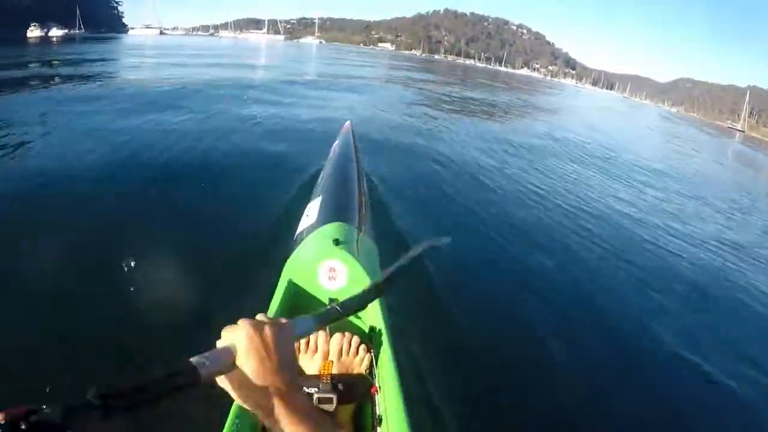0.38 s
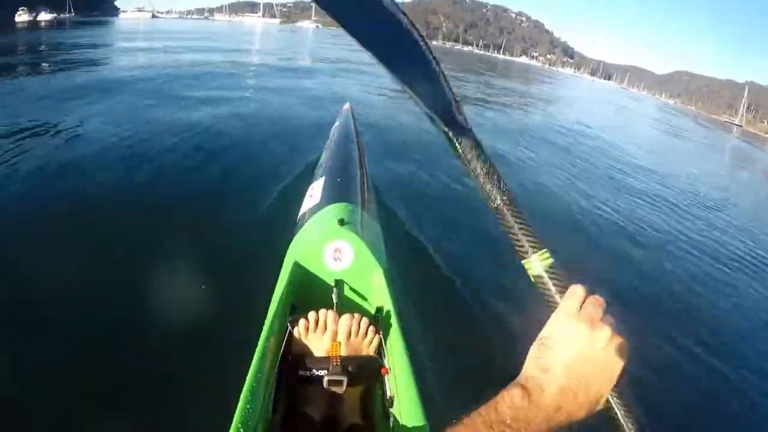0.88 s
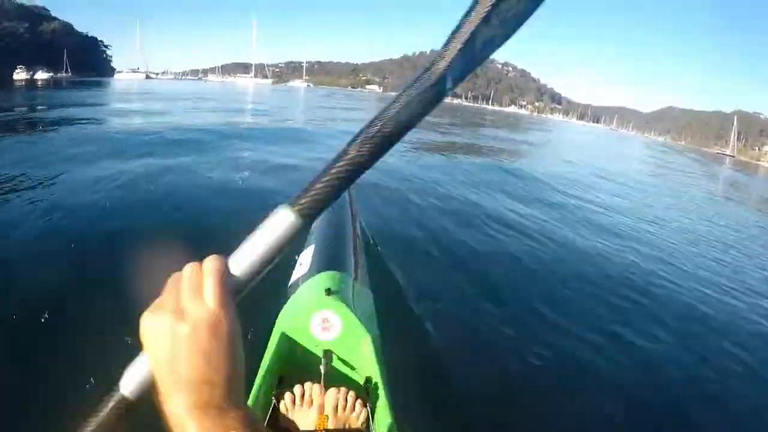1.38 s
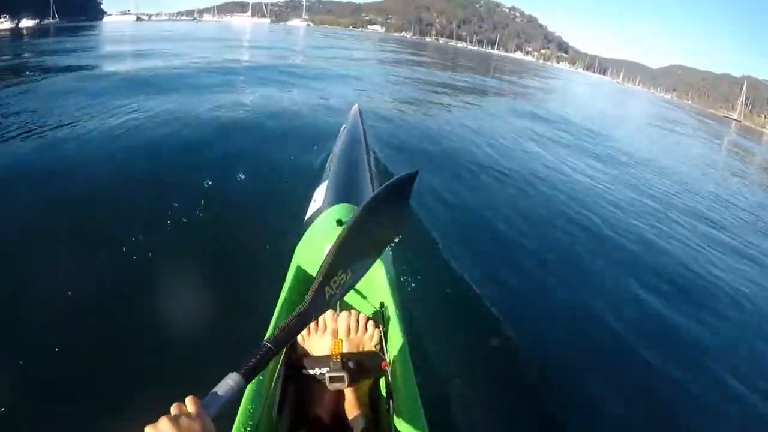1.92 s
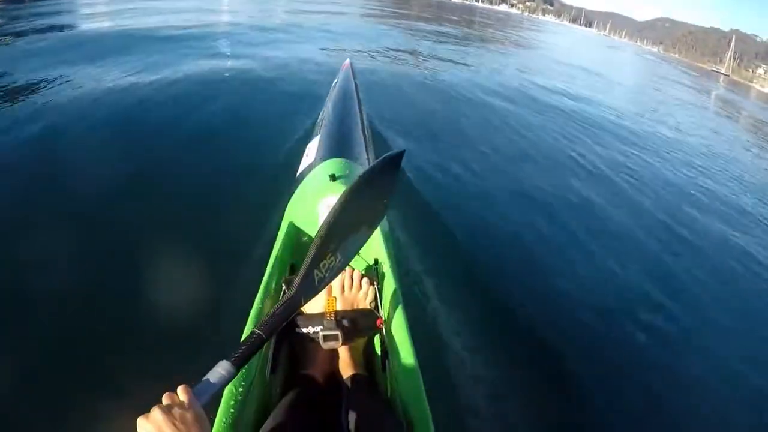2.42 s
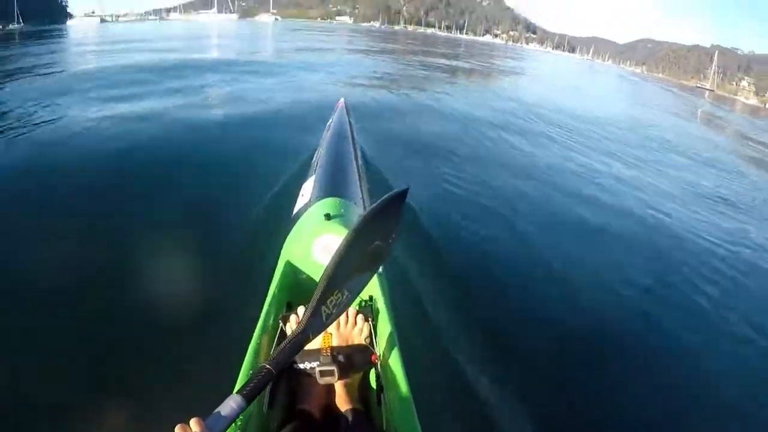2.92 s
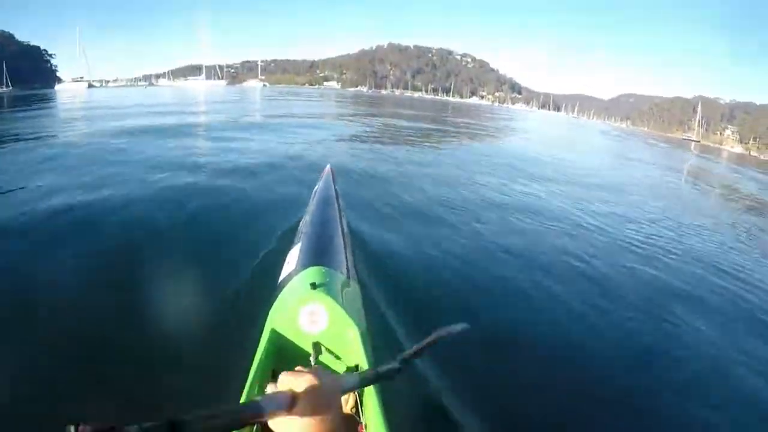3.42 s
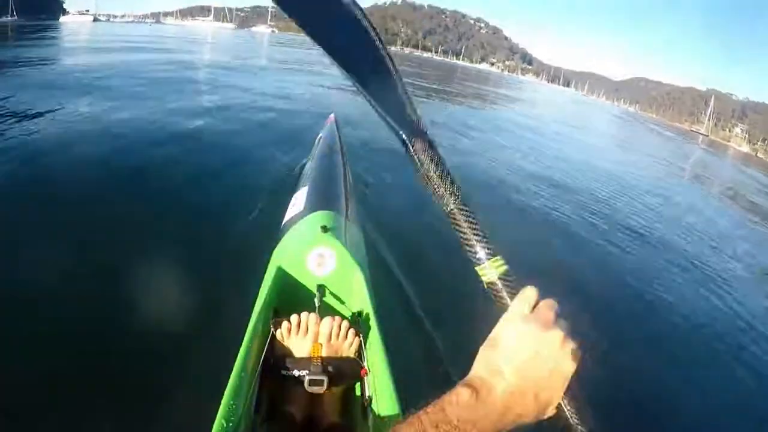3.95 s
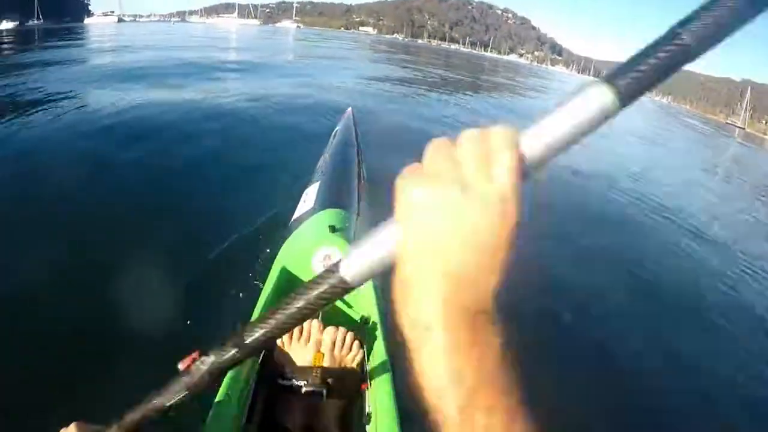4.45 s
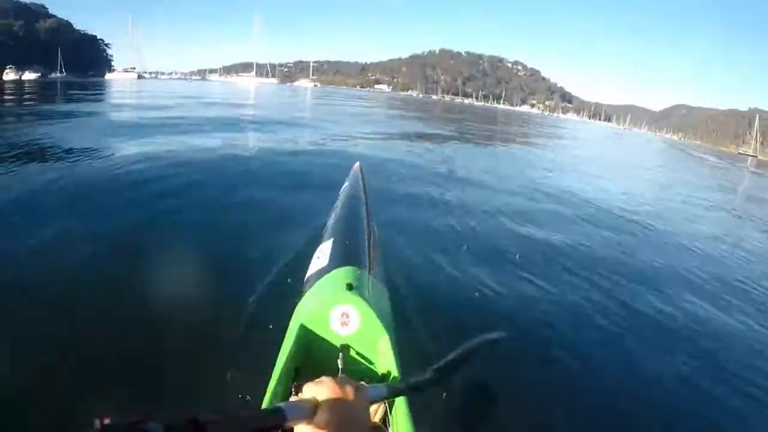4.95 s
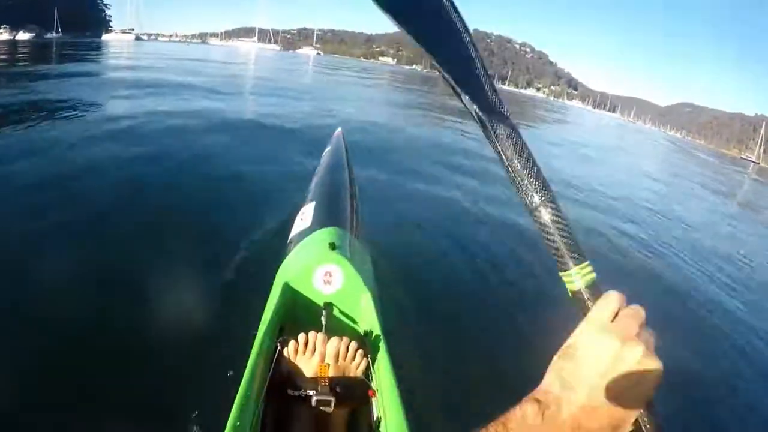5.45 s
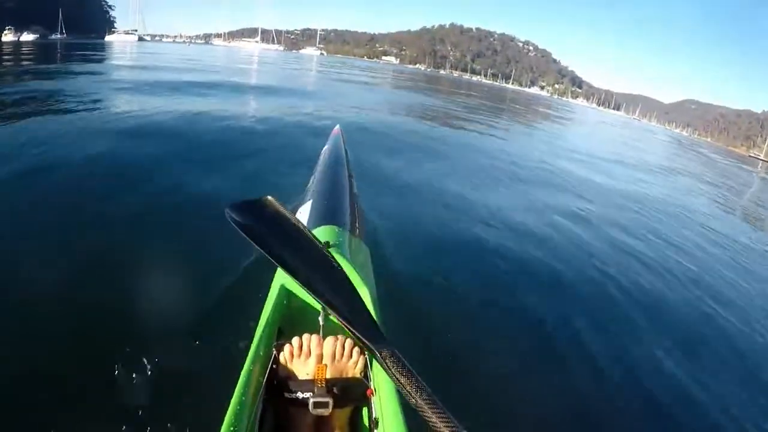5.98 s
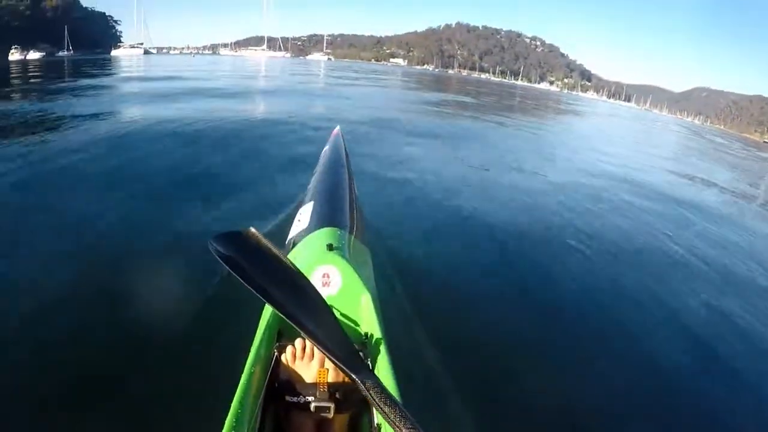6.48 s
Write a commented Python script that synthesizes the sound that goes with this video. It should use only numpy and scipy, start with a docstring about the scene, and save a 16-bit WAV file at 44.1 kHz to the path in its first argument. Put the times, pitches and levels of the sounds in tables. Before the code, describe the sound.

Close, muffled stereo sound of paddling, dry and without echo. Water rushes and trickles against the hull over a wavering deep rumble. A sharp wet splash and a cluster of bubbly plops come early, followed by a calmer glide with occasional drips. Swishing strokes resume, with a quick pair of dull knocks and another heavier knock with a low thud, then gentle dripping.

```python
"""A kayak glides over calm water, heard by two microphones inside a sealed camera housing worn by the paddler.
From the start, air and body motion rumble below a hiss, and wash, spray and gurgling bubbles run on: all shaped noise
or clusters of short tones. Drops (noise bursts) and pitched plops fall throughout, the drops strongest near 1.3 s,
the plops near 1.5 s. Swishes, which are longer bursts, stand out near 3.5 s. Three knocks travel up through
the mount at 4.2, 4.27 and 5.11 s as swelling tones, then water and small drops carry on to the end at 6.6 s."""
import sys
import numpy as np
from scipy import signal
from scipy.fft import rfft, irfft, next_fast_len
from scipy.io import wavfile
from scipy.ndimage import uniform_filter1d

SR = 44100
rng = np.random.default_rng(int(sys.argv[2]) if len(sys.argv) > 2 else 0)


def digitize_waveform(pressure):
    """Quantize a signal to 16-bit integers and store it at the path in sys.argv[1].

    Rows of a 2-D input are taken as channels; values are limited to [-1, 1].
    """
    field = np.atleast_2d(pressure).T
    bounded = np.clip(field, -1, 1)
    quanta = np.round(bounded * 32767).astype(np.int16)
    wavfile.write(sys.argv[1], SR, quanta)


def field_ratio(decibels):
    """Amplitude ratio for a level in dB (20 dB per decade); scalars and array-likes work."""
    return 10 ** (np.asarray(decibels, dtype=float) / 20)


N = 291525  # length in samples, about 6.6 s


def rms_one(x):
    """Scale a sound so that its rms is 1."""
    return x / np.sqrt(np.mean(x ** 2) + 1e-20)


def in_time(rows):
    """Join the rows of a time table by straight lines: one value a sample for each column."""
    seconds, *columns = np.transpose(rows)
    return [np.interp(np.arange(N) / SR, seconds, column) for column in columns]


def drift(rate_hz):
    """Slow random wandering of rms 1: noise smoothed to about rate_hz."""
    step = 40  # samples between computed points
    r = np.exp(-2 * np.pi * rate_hz * step / SR)
    noise = rng.standard_normal(N // step + 2002)
    slow = signal.lfilter([1], [1, -2 * r, r * r], noise)[2000:]  # skip the filter's settling
    return np.interp(np.arange(N) / step, np.arange(len(slow)), rms_one(slow))


def coloured(spectrum):
    """Noise of rms 1, its frequencies weighted by a spectrum table."""
    size = next_fast_len(N)
    hz, db = np.transpose(spectrum)
    log_hz = np.log(np.arange(size // 2 + 1) * SR / size + 1)
    weight = field_ratio(np.interp(log_hz, np.log(hz), db))
    return rms_one(irfft(rfft(rng.standard_normal(size)) * weight, size)[:N])


def add(track, start_s, piece):
    """Mix a short piece into a track at start_s seconds."""
    i = round(start_s * SR)
    track[i:i + len(piece)] += piece[:N - i]


def ring(force, hz, t60, lead=0):
    """A resonance: a unit click starts a sine at phase lead, which falls by 60 dB in t60 seconds."""
    r = field_ratio(-60 / (t60 * SR))
    w = 2 * np.pi * hz / SR
    return signal.lfilter([np.sin(lead), r * np.sin(w - lead)], [1, -2 * r * np.cos(w), r * r], force + 1e-18)


def housing(force, modes, apart):
    """One force rings each resonance, wall and cavity in series; a share of the right side hears another spot."""
    # the other spot: noise from elsewhere in time, given the loudness of this moment
    loudness = np.sqrt(uniform_filter1d(force ** 2, size=64) + 1e-18)
    other = np.roll(force / loudness, N // 3) * loudness
    right_force = np.sqrt(1 - apart) * force + np.sqrt(apart) * other
    out = np.zeros((2, N))
    for hz, width, left_db, right_db, lead in modes:
        t60 = np.log(1000) / (np.pi * width)  # a wide resonance dies quickly
        gain = 2 * np.pi * width ** 1.662 / SR
        out[0] += field_ratio(left_db) * gain * ring(ring(force, hz, t60), hz, t60)
        out[1] += field_ratio(right_db) * gain * ring(ring(right_force, hz, t60), hz, t60, lead)
    return out


def bursting_rush(per_s, spread_db, clump_db, smooth):
    """Tiny bubbles burst as single clicks over a smooth rush of noise; both swell and sink in clumps."""
    sizes = field_ratio(spread_db * np.minimum(rng.exponential(1, N), 5)) * rng.choice([-1, 1], N)
    born = rng.random(N) < per_s / SR
    return field_ratio(clump_db * drift(19)) * (rms_one(sizes * born) + smooth * rng.standard_normal(N))


# Drops and slaps. Each row: start in seconds, strength in dB before the housing, centre in octaves above
# 1450 Hz, loss in dB per octave away from that centre.
DROPS = [(.381, -37.5, 1.1, 13), (0.4943, -31, 2, 22), (0.532, -42.5, 2, 9), (0.619, -48, 1, -1),
         (0.7483, -38, 3, 4.5), (1.034, -35, 0.8, 9), (1.1204, -38.5, 0.2, 4), (1.2369, -38, 2, 7),
         (1.2614, -39, 4.2, 0), (1.3135, -18, 0.2, 52), (1.318, -22, 1.53, 10), (1.3306, -38, 1.5, 9),
         (1.4476, -38, 0, 16), (1.7927, -29.5, 0.78, 55), (2.3248, -27.5, 0.07, 32),
         (2.832, -33.5, -0.5, 7), (2.9452, -28.5, 0.1, 19), (3.3071, -32.5, -0.2, 34), (3.5188, -43, 1, 21),
         (3.592, -36.5, 2.5, 9.5), (3.8042, -39.5, 2.5, 20), (4.027, -38, -3, 16), (4.104, -38, -0.9, 7),
         (4.1684, -40, 0.3, 6), (4.3488, -44.5, 3, 3), (4.421, -29, 1.5, 18), (5.0478, -34, 0, 12),
         (5.2783, -31, 0, 20), (5.746, -40, 0, 7), (5.8568, -34, 0.8, 11), (5.8735, -40, -0.5, 4),
         (6.434, -45, -0.4, 2), (6.4733, -38.5, .5, 9), (6.5008, -38.5, .3, 12)]
# Longer swishes as the blade enters or leaves the water. Each row: start in seconds, strength in dB before
# the housing, centre in octaves above 1450 Hz.
SWISHES = [(0.499, -50, -3), (1.216, -46.5, 2), (1.324, -54, 5), (1.80, -48, -2.8), (3.505, -40.5, -6),
           (3.60, -42, -9), (4.095, -44.5, -2), (4.327, -43, 5.5), (5.019, -47, 4.5), (5.73, -57, -3),
           (5.85, -50, -0.5)]


def drops(hz):
    """The bursts of noise as they push resonances near hz: each swells quickly and dies away."""
    drop_s, swish_s, swish_loss = 0.0038, 0.028, 1  # decay times in s, dB per octave
    most_loss_db = 21  # every burst still reaches far resonances this much weaker
    out, t = np.zeros(N), np.arange(6000) / SR
    octave = np.log2(hz / 1450)
    bursts = [(*row, drop_s) for row in DROPS] + [(*row, swish_loss, swish_s) for row in SWISHES]
    noises = rng.choice([-1, 1], (len(bursts), len(t)))
    for (start, strength_db, centre, loss, decay_s), noise in zip(bursts, noises):
        shape = (1 - np.exp(-t / (0.53 * decay_s))) * np.exp(-t / decay_s)
        shape = shape / np.sqrt(min(decay_s, 0.006) * SR)
        loss_db = min(abs(loss * (octave - centre)), most_loss_db)
        add(out, start, field_ratio(strength_db - loss_db) * noise * shape)
    return out


# Flow of the water. Each row: time in seconds, then the levels in dB of the wash along the hull,
# the spray off the blade and the trickle.
WATER = [(0.0, -47.5, -61, -72), (0.31, -50, -65, -68), (0.6, -46, -57, -74), (0.99, -47, -65.5, -77),
         (1.4, -45.5, -60.5, -70), (1.6, -48.5, -64.5, -71), (2.3, -49.5, -64, -91),
         (3.09, -51.5, -61, -90), (3.28, -50, -64, -81), (3.42, -59, -65, -86), (3.6, -47.5, -66.5, -69),
         (3.76, -42.5, -60.5, -79), (4.14, -49, -73, -71), (4.3, -54.5, -71, -79), (4.4, -57.5, -60, -75),
         (4.5, -48, -60, -62), (4.75, -50.5, -68.5, -84), (5.21, -50, -63, -82), (5.43, -46, -69, -80),
         (5.69, -49.5, -64, -66), (5.82, -54.5, -62.5, -60), (5.98, -58.5, -74, -72), (6.2, -61, -62, -70),
         (6.61, -59.5, -65.5, -63.5)]
# Patter, then fizz, which follow the other water. Each row: level in dB at mean flow, the shares taken of the
# swings of wash, spray and trickle, lag in seconds.
FOLLOW = [(-58, 0.41, 0.5, 0.067, .01), (-62, 0.7, 0.42, -0.2, 0.072)]
# Housing resonances in groups for wash, patter, fizz, trickle and spray. Each row: pitch in Hz, width in Hz of
# each of the two stages, left and right gain in dB, lead of the right side in radians.
HOUSING = [
    [(1168, 150, -1, 3, 4), (1280, 79, -3.5, 3, -2), (1490, 297, -2, 6.5, -1), (1694, 220, -6.5, -3, 1)],
    [(2055, 320, 0, 3.5, -1.56), (2660, 320, 4, 1.5, 4)],
    [(3095, 280, -9, -8, 1.3), (3273, 346, -0.5, -2.5, -1.07), (3503, 214, -8.5, -5.5, 0.9)],
    [(4870, 830, -31, -5, 2.02)],
    [(5740, 960, -1.5, -5, 0.13), (6360, 1650, -3.5, -10, 3.6), (7650, 3800, -14, -15.5, 1.6)],
]
# Texture of wash, patter, fizz, trickle and spray. Each row: bursts per second, size spread in dB, clumping in
# dB, amount of smooth rush, share heard apart on the right (0 to 1), gain of the drops in dB.
GRAIN = [(504, 2.5, 1.54, 1, 0.21, -17.5), (900, -1, 3, 0.93, 0.09, -20), (696, 2.5, 1, 0.84, 0.1, -15),
         (487, 2.5, 0.5, 0.35, 0.36, -13), (1200, 2.5, 2.5, 0.51, 0.98, -16.5)]


def water():
    """Each kind of water, with its share of the drops, rings its own group of housing resonances."""
    flows, t = np.array(in_time(WATER)), np.arange(N) / SR
    wash_db, spray_db, trickle_db = flows
    swings = flows - flows.mean(axis=1, keepdims=True)
    patter_db, fizz_db = [db + np.interp(t - lag, t, np.dot(shares, swings)) for db, *shares, lag in FOLLOW]
    levels = [wash_db, patter_db, fizz_db, trickle_db, spray_db]
    out = np.zeros((2, N))
    for level_db, modes, (*texture, apart, drop_db) in zip(levels, HOUSING, GRAIN):
        rush = bursting_rush(*texture)
        rung_rms = np.sqrt(np.mean(housing(rush, modes, apart) ** 2))
        mean_hz = np.mean(modes, axis=0)[0]
        force = field_ratio(level_db) * rush / rung_rms + field_ratio(drop_db) * drops(mean_hz)
        out += housing(force, modes, apart)
    return out


def swing(hz, rise, lead=0):
    """Bending waves arrive spread out: a tone swells to a deep trough in about rise seconds, then dies."""
    t = np.arange(4000) / SR
    envelope = (t / rise) ** 2.24 * np.exp(2.55 * (1 - t / rise))
    return -envelope * np.cos(2 * np.pi * hz * (t - rise) + lead)


# Knocks. Each row: start in seconds, strength in dB before the mount's own gains, contact pitch in Hz, loss in
# dB per squared octave away from it, most loss in dB (the crack), stretch of the mount's swell times, thud level
# in dB, thud delay in seconds.
KNOCKS = [(4.2010, -14.5, 420, 10.5, 14.5, 0.86, -11.5, 0.0077),
          (4.2685, -10.5, 545, 13.5, 27, 0.62, -22, 0.0061), (5.1116, -2, 690, 35.5, 22.5, 1, -7, 0.0065)]
# Tones of the mount. Each row: pitch in Hz, swell time in seconds before the knock's stretch, left and right
# gain in dB, lead of the right side in radians.
MOUNT = [(229.6, 0.01125, 1, 1.5, 0.63), (420, 0.0033, 2.5, -11, 4.5), (609, 0.00356, -7, -9.5, -2),
         (830, 0.00167, -6.5, -8.5, -2.5), (1175, 0.00188, 1.5, -5, -2.5), (1580, 0.0017, -5, -0.5, 8),
         (2020, 0.00175, -14, -10.5, -1.5), (2670, 0.0018, -21, -20, 1)]


def knocks():
    """A knock favours mount tones near its contact pitch, its crack reaches all; a low thud follows on both sides."""
    thud_hz, thud_rise_s = 84.7, 0.0095
    linger_db, linger_t60_s = -14, 0.041  # each tone also rings on faintly
    out, t = np.zeros((2, N)), np.arange(4000) / SR
    for start, strength_db, contact_hz, loss, crack_db, stretch, thud_db, delay in KNOCKS:
        for hz, rise, left_db, right_db, lead in MOUNT:
            level_db = strength_db - min(loss * np.log2(hz / contact_hz) ** 2, crack_db)
            linger = field_ratio(linger_db - 60 * t / linger_t60_s) * (1 - np.exp(-t / rise))
            for side, db, phase in zip(out, [left_db, right_db], [0, lead]):
                tail = -linger * np.cos(2 * np.pi * hz * (t - rise * stretch) + phase)
                add(side, start, field_ratio(level_db + db) * (swing(hz, rise * stretch, phase) + tail))
        for side in out:
            add(side, start + delay, -field_ratio(thud_db) * swing(thud_hz, thud_rise_s))
    return out


def bubble(hz, t60, lead=0):
    """A bubble near the surface rings as a decaying sine; its pitch climbs by 26 % over t60 seconds."""
    t = np.arange(round(t60 * SR)) / SR
    envelope = field_ratio(-60 * t / t60) * (1 - np.exp(-t / 0.00013))
    return envelope * np.sin(2 * np.pi * hz * t * (1 + 0.13 * t / t60) + lead)


# Bubbles that pop with a pitch. Each row: start in seconds, strength in dB, middle pitch in Hz, length of the
# plop in seconds, tilt to the left over the right in dB.
PLOPS = [(.219, -33, 827, .05, -6), (0.382, -41, 1680, 0.026, 5), (1.354, -35, 1200, 0.0387, -1),
         (1.409, -39, 1010, .04, 1), (1.45, -42, 910, 0.04, -12), (1.505, -30.5, 1050, 0.036, -1.5),
         (1.592, -43, 914, 0.033, -9), (1.793, -38, 2044, 0.082, -5), (4.029, -33, 1710, 0.028, 4),
         (4.716, -39, 1190, 0.026, -1), (4.952, -35, 900, 0.045, -5.5), (5.28, -53, 1580, 0.043, -14),
         (5.791, -41.5, 2114, 0.065, 10), (6.434, -37, 2200, 0.036, 8)]


def plops():
    """Each plop is a cluster of eight bubbles; the right side is shifted in phase as the housing makes it."""
    out, modes = np.zeros((2, N)), np.array(sum(HOUSING, []))
    clusters = rng.random((len(PLOPS), 8, 2))
    for (start, strength_db, hz, length, tilt_db), cluster in zip(PLOPS, clusters):
        t60 = 0.77 * length
        for late, pitch in cluster:
            own_hz = hz * 2 ** (1.1 * (pitch - 0.5))
            own_start = start + 0.3 * length * late ** 2  # most come early
            lead = np.interp(own_hz, modes[:, 0], modes[:, 4])
            add(out[0], own_start, field_ratio(strength_db - 7.0 + tilt_db / 2) * bubble(own_hz, t60))
            add(out[1], own_start, field_ratio(strength_db - 4.5 - tilt_db / 2) * bubble(own_hz, t60, lead))
    return out


# Bubbling along the hull, loudest as the blade leaves the water near 1.36 s.
# Each row: time in seconds, level in dB.
GURGLE = [(0.0, -45.5), (0.3, -50), (0.86, -52), (1.28, -52), (1.36, -43.5), (1.58, -47), (1.75, -50.5),
          (2.54, -55), (2.89, -67), (3.29, -69), (3.75, -54), (4.42, -51.5), (4.95, -52.5), (6.61, -62)]


def gurgle():
    """2500 bubbles of random time, pitch and size ring along the hull."""
    out = np.zeros((2, N))
    for when, pitch, size, lead in rng.random((2500, 4)):
        hz = 520 * 2 ** (1.6 * pitch)
        for side, phase in zip(out, [0, 2.83 + 1.66 * lead]):
            add(side, when * (N - 1) / SR, field_ratio(-14 * size) * bubble(hz, 13 / hz, phase))
    return field_ratio(in_time(GURGLE)[0]) * rms_one(out)


# Rumble of air and body motion. Each row: time in seconds, deep level in dB, upper level in dB.
RUMBLE = [(0.0, -47, -37.5), (0.03, -23.5, -38.5), (0.51, -29.5, -39), (1.05, -26, -40.5),
          (1.12, -32.5, -37.5), (1.36, -21, -36.5), (1.99, -29, -40), (2.01, -36, -38), (2.49, -35.5, -41),
          (3.54, -29.5, -44), (4.2, -35, -41.5), (4.47, -28.5, -40), (4.79, -31, -42), (5.1, -26, -41.5),
          (6.5, -44, -43), (6.61, -34, -41.5)]
# Colour of the deep rumble. Each row: frequency in Hz, relative weight in dB per Hz.
DEEP = [(7.1, -7), (12, -6), (33, 2), (46, -8), (70, -11.5), (91, -81), (150, -120)]
# Colour of the upper rumble. Each row: frequency in Hz, relative weight in dB per Hz.
UPPER = [(32, -97), (55, -10), (86, -1.5), (161, -18), (259, -16.5), (301, -30.5), (367, -35), (420, -31),
         (550, -35), (920, -120)]


def rumble():
    """Lumpy low noise in two bands, alike in both microphones; the upper one wavers slightly."""
    deep_db, upper_db = in_time(RUMBLE)
    deep = field_ratio(deep_db) * coloured(DEEP)
    upper = field_ratio(upper_db + 0.5 * drift(15)) * coloured(UPPER)
    return deep + upper


# Colour of the hiss shared by both microphones. Each row: frequency in Hz, relative weight in dB per Hz.
HISS = [(180, -21), (300, -1), (420, -8), (900, -13.5), (3000, -20.5), (3950, -23), (5200, -24.5),
        (9150, -23.5), (12500, -33.5), (13800, -38.5), (15000, -71)]
# Colour of the noise of opposite sign left and right. Each row: frequency in Hz, relative weight in dB per Hz.
OPPOSED = [(24, -49), (40, 4), (122, -4.5), (291, -9), (560, -12.5), (1000, -11), (3000, -26),
           (3800, -36.5), (4600, -29.5), (10100, -35.5), (12600, -43.5), (15000, -54)]


def hiss():
    """Steady noise: a common part and a part of opposite sign left and right."""
    common = field_ratio(-56) * coloured(HISS)
    opposed = field_ratio(-46) * coloured(OPPOSED)
    return common + opposed * [[1], [-1]]


def scene():
    """Water rung by the housing, knocks, plops, gurgling, rumble and hiss are added together, without echo."""
    return water() + knocks() + plops() + gurgle() + rumble() + hiss()


def roll_off(x):
    """The treble ends steeply here."""
    return signal.sosfilt(signal.butter(12, 15100, fs=SR, output="sos"), x)


def record(dry):
    """A steep filter takes off the top, 40 dB down from 15300 Hz."""
    top_cut = signal.cheby2(18, 40, 15300, fs=SR, output="sos")
    finished = signal.sosfilt(top_cut, dry)
    return roll_off(finished)


dry = scene()
out = record(dry)
digitize_waveform(out)
```